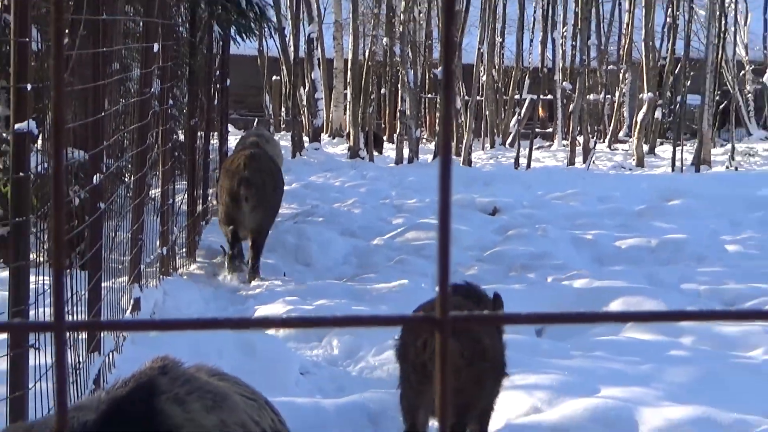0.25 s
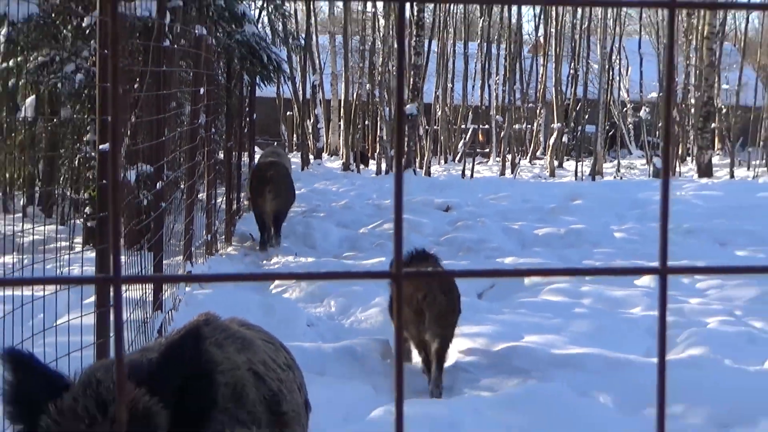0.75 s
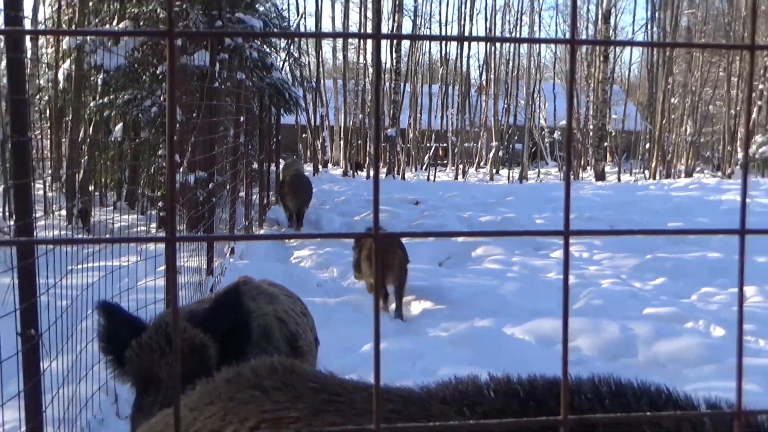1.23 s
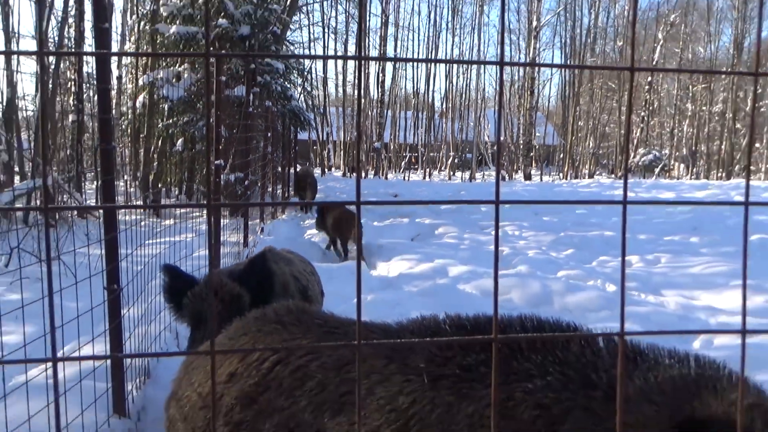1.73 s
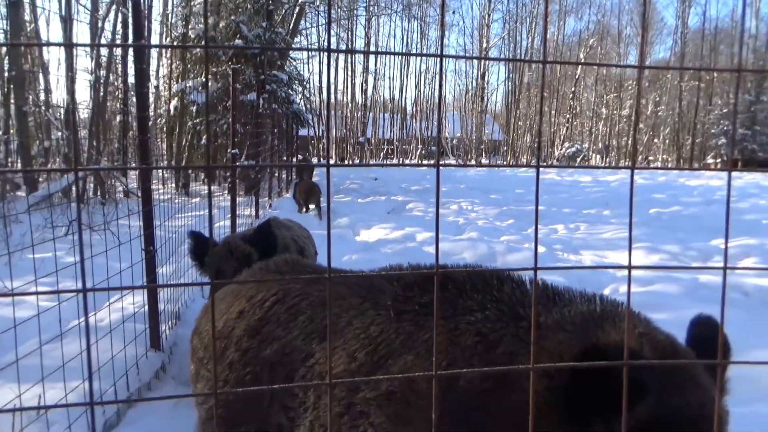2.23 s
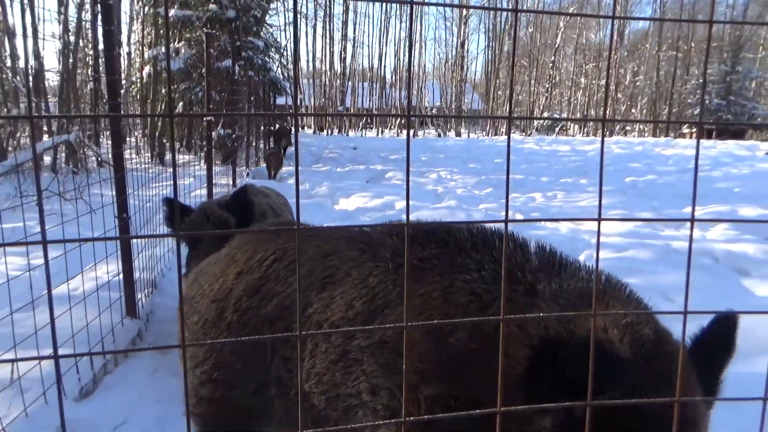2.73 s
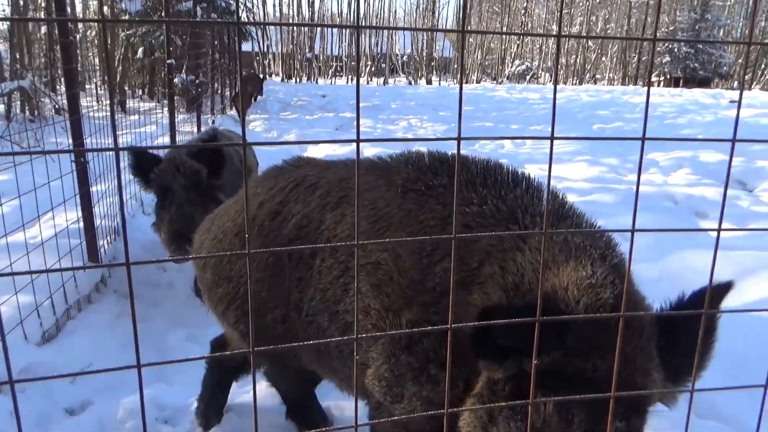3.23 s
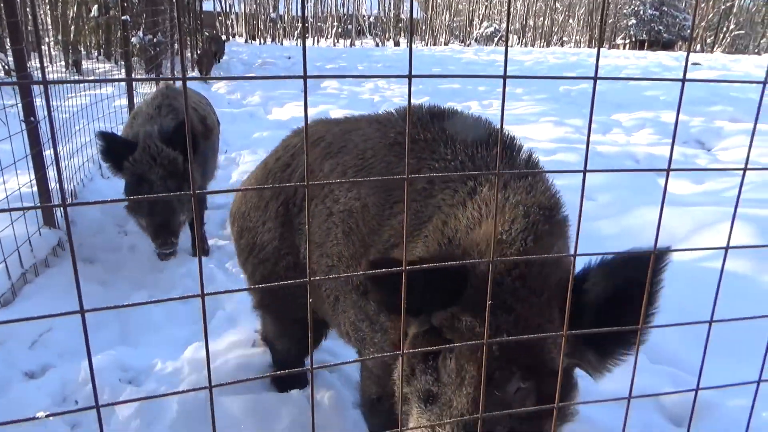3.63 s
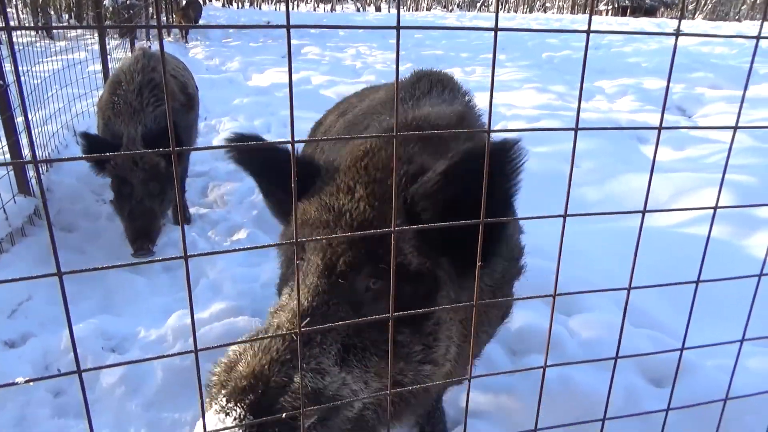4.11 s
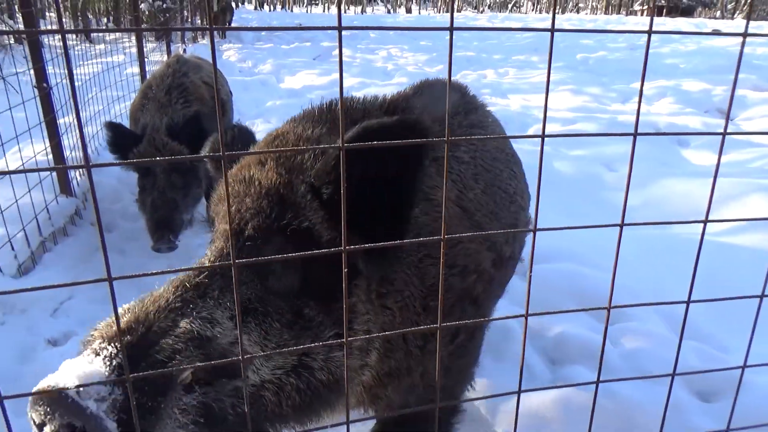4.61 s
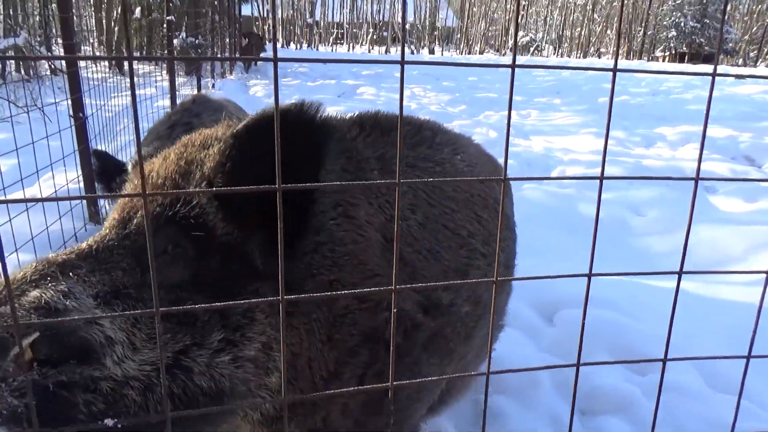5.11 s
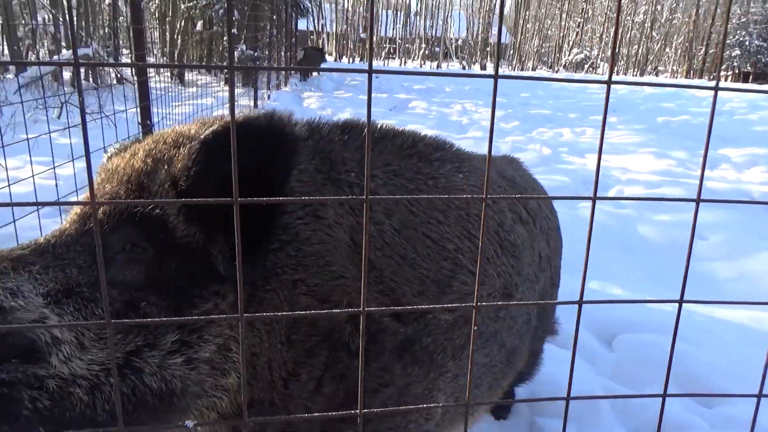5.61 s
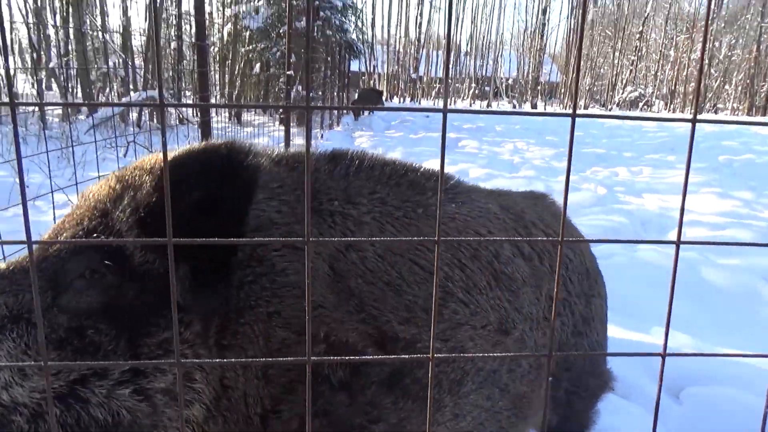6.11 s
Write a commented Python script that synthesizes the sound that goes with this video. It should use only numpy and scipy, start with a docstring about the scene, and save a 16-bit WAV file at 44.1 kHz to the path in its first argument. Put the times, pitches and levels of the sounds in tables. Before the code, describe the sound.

Still, open winter air with a soft hiss and faint deep hum throughout. From 0.2 s, very quiet hoof steps press distant snow. At about 0.8 s a muffled low grunt begins, then a fuller pulsing one from 1.1 to 1.4 s, rising at its end, with brief dry throat rattles around it; a weaker grunt and rattle follow at 1.5 s. It falls nearly silent, with a faint grunt at 2.3 s. From 2.6 s crisp crackles start close by, with hollow pops near 2.9 s, growing into heavy crunching from 3.2 to 4.0 s and brittle cracking until 4.8 s, including a sharp snap at 4.2 s. At 4.9 s comes a hard crack and a strong, pinched, whistling sniff. Shorter sniffs, wet jaw claps, dull bumps and crunches continue, with another strong sniff at 6.1 s and low thumps to the end.

```python
"""In a snowy pen, wild boars trot away and grunt low in the distance, with dry rattles in the throat.
A big one wades up to the wire fence, its hooves crunching through the crust, then sniffs and smacks its jaws.
Still winter air and a faint low hum lie under it all. Snow is made of tiny random breaks, grunts of slow
pulses through a chest, rattles of short puffs, and sniffs of noise ringing in the nostrils."""
import sys
import numpy as np
from scipy import signal
from scipy.fft import rfft, irfft, next_fast_len
from scipy.io import wavfile
from scipy.ndimage import uniform_filter1d, map_coordinates

SR = 44100
rng = np.random.default_rng(int(sys.argv[2]) if len(sys.argv) > 2 else 0)


def materialize(psi):
    """Save the field psi as 16-bit PCM at rate SR to the path in sys.argv[1].

    A 1-D psi becomes a single channel; in a 2-D psi each row is a channel.
    """
    bounded = np.clip(np.atleast_2d(psi).T, -1, 1)
    quanta = np.round(bounded * 32767).astype(np.int16)
    wavfile.write(sys.argv[1], SR, quanta)


N = 280374


def amp(db):
    """Turn decibels into a gain."""
    return 10 ** (np.asarray(db) / 20)


def unit(x):
    """Scale x to an rms (average strength) of 1."""
    return x / np.sqrt(np.mean(x ** 2) + 1e-20)


def along(points, hz):
    """Read a curve of (Hz, value) points on a logarithmic frequency axis."""
    point_hz, values = np.transpose(points)
    return np.interp(np.log(hz + 1), np.log(point_hz + 1), values)


def wobble(rate):
    """A smooth random curve with this many random points a second."""
    points = rng.standard_normal(int(N * rate / SR) + 4)
    return map_coordinates(points, [np.arange(N) * rate / SR])


def swell(s, hold, attack, release):
    """A gain that rises 60 dB over the attack up to time s, holds, and falls 60 dB over the release."""
    t = np.arange(0, N / SR, 1 / 1000)
    before = np.maximum(s - t, 0) / attack
    after = np.maximum(t - s - hold, 0) / release
    gain = np.exp(-np.log(1000) * np.minimum(before + after, 10))
    return np.interp(np.arange(N) / SR, t, gain)


def filtered(x, response):
    """Multiply the spectrum of x by a response, given as a function of frequency."""
    m = next_fast_len(N + SR // 4)
    return irfft(rfft(x, m) * response(np.fft.rfftfreq(m, 1 / SR)), m)[..., :N]


def coloured(x, spectrum):
    """Shape x by a spectrum and scale it to rms 1."""
    return unit(filtered(x, lambda hz: amp(along(spectrum, hz))))


def resonances(modes):
    """The response of a few damped resonances, neighbours taken with opposite signs."""
    def response(f):
        total = 0
        for k, (centre, width, db) in enumerate(modes):
            ring = 1j * f * width / (centre ** 2 - f ** 2 + 1j * f * width)
            total = total + (-1) ** k * amp(db) * ring
        return total
    return response


def impulse(spectrum, size=2048):
    """The most compact click with this spectrum that starts at time zero (minimum phase)."""
    cepstrum = irfft(np.log(amp(along(spectrum, np.fft.rfftfreq(size, 1 / SR)))))
    cepstrum[1:size // 2] *= 2
    cepstrum[size // 2 + 1:] = 0
    return irfft(np.exp(rfft(cepstrum)))


def stereo(pair, alike):
    """Mix two unrelated signals to left and right with a given likeness at each frequency."""
    def mid_and_side(hz):
        angle = np.arccos(np.clip(along(alike, hz), -1, 1)) / 2
        return np.array([np.cos(angle), np.sin(angle)])
    mid, side = filtered(pair, mid_and_side)
    return np.array([mid + side, mid - side])


def surroundings(x, t60, size=8192):
    """A short scatter from the fence and the animals, as fading noise; snow swallows the rest."""
    tail = rng.standard_normal((2, size)) * amp(-60 * np.arange(size) / SR / t60)
    return signal.fftconvolve(x, tail / np.linalg.norm(tail[0]), axes=1)[:, :N]


# The tone of the still air. Each row: frequency in Hz, relative strength in dB per Hz.
AIR = [(20, -25), (45, -3), (90, -6.5), (160, -7.5), (225, -3), (268, 3), (330, -6), (580, -6.5), (770, -2),
       (1100, -8), (6000, -17), (9000, -16), (15000, -25)]
# How alike the air is on both sides. Each row: frequency in Hz, left-right likeness (1 is identical).
AIR_ALIKE = [(60, 1), (300, 0.85), (1000, 0.25), (3000, 0.53), (8000, 0.99)]
# The steady hum. Each row: frequency in Hz, average level in dB.
HUM = [(55.8, -65), (215, -76.5)]


def background():
    """Still air as soft noise, and a low hum of sine tones that are slightly unsteady."""
    t = np.arange(N) / SR
    air = stereo(coloured(rng.standard_normal((2, N)), AIR), AIR_ALIKE)
    air = air * amp(-61.5 + 0.22 * wobble(rate=4.45))
    hum = np.zeros(N)
    for hz, db in HUM:
        level = amp(db + 0.38 * wobble(rate=4.6))
        phase = 2 * np.pi * hz * t + 0.4 * wobble(rate=2.6)
        hum += level * np.sqrt(2) * np.sin(phase)
    return air + hum


def grains(rate, spread_db):
    """Two streams of tiny ice fractures of unequal size, this many a second on average."""
    size = amp(spread_db * np.clip(rng.standard_normal((2, N)), -2, 2))
    happens = rng.random((2, N)) < rate / SR
    return unit(happens * size * rng.choice([-1, 1], (2, N)))


# The tone of the breaking crust. Each row: frequency in Hz, relative strength in dB per Hz.
CRUST = [(150, -54), (500, -10.5), (1100, -5), (2300, -2.5), (5200, -6.5), (7000, -3.5), (8700, 0),
         (10000, -4), (12000, -10), (16000, -28)]
# How alike the snow sounds on both sides. Each row: frequency in Hz, left-right likeness (1 is identical).
SNOW_ALIKE = [(120, 1), (400, 0.98), (1000, 0.94), (2300, 0.93), (5000, 0.98), (10000, 1)]
# Hoof falls of the distant boars in the snow. Each row: time in seconds, level in dB.
FAR_STEPS = [(.24, -66.5), (.73, -67), (.96, -69), (1.07, -67), (1.25, -59.5), (1.38, -62), (1.62, -61),
             (1.83, -72), (1.99, -68)]


def far_steps():
    """Distant hooves break ice grains in clumps; each step swells and fades."""
    load = np.zeros(N)
    for s, db in FAR_STEPS:
        load += amp(db) * swell(s, hold=0.0086, attack=0.28, release=0.52)
    crust = coloured(grains(rate=7900, spread_db=5.0) * amp(2.3 * wobble(rate=190)), CRUST)
    return stereo(load * crust, SNOW_ALIKE)


# Resonances of the mouth. Each row: frequency in Hz, width in Hz, level in dB.
MOUTH_MODES = [(1570, 1060, 5), (2520, 820, 5.5), (4440, 1700, -4)]
# Bouts of dry rattling in the throat. Each row: first pulse in seconds, last pulse in seconds,
# first strength in dB, last strength in dB, first brightness in dB, last brightness in dB.
RATTLE = [(1.04, 1.07, -35.5, -42, 0, -2), (1.094, 1.164, -42.5, -44, 5, 12),
          (1.288, 1.368, -39.5, -43, 5, 4), (1.524, 1.602, -37, -33.5, 4.5, -2.5)]
PULSE_GAP_S, PULSE_T60_S = 0.0255, 0.014  # approximate gap between pulses; time for one to fade 60 dB


def rattle(size=1024):
    """Throat pulses are short puffs ringing the mouth; brightness shifts weight to its highest resonance."""
    puffs = np.zeros((len(MOUTH_MODES), N))
    fade_db = -60 * np.arange(size) / SR / PULSE_T60_S
    height = np.linspace(-1, 1, len(MOUTH_MODES))[:, None]  # lowest to highest resonance
    for first, last, first_db, last_db, first_bright, last_bright in RATTLE:
        count = round((last - first) / PULSE_GAP_S) + 1
        start, end = (first, first_db, first_bright), (last, last_db, last_bright)
        for s, db, bright_db in np.linspace(start, end, count):
            uneven_db = 0.5 * rng.standard_normal(height.shape)
            strength_db = db + bright_db * height + uneven_db
            puffs[:, round(s * SR):][:, :size] += amp(strength_db + fade_db) * rng.standard_normal(size)
    direct = np.zeros(N)
    for puff, (centre, width, db) in zip(puffs, MOUTH_MODES):
        ring = resonances([(centre, width, 0)])
        # the third power leaves dark valleys between resonances
        direct += amp(db) * filtered(puff, lambda hz: ring(hz) ** 3)
    return direct + amp(-7) * surroundings(direct[None], t60=0.43)


# Low grunts. Each row: time in seconds, hold in seconds, starting pulse rate in Hz, fall of that rate in Hz
# per second, level in dB before the last push, mouth opening from 0 to 1, strength of the last push from 0 to 1.
GRUNTS = [(0.789, 0.16, 55.6, 20.6, -55, 0, 0), (1.077, 0.29, 42.1, 6.7, -55, 0.96, 0.74),
          (1.52, 0.103, 60.9, 55, -66.5, 1, 0.05), (2.302, .09, 59.9, 20, -66, 0, 0.02)]
# a full last push: its length, its rise in pitch and level, and how far the mouth closes (0 to 1)
PUSH_S, PUSH_HZ, PUSH_DB, PUSH_CLOSES = 0.1, 17, 7, 0.74


def grunt_controls():
    """Pitch, loudness and mouth: a grunt sags in pitch, and a last push lifts it as the mouth closes."""
    t = np.arange(N) / SR
    total, pitch, mouth = np.zeros((3, N))
    for s, hold, hz, sag, db, opening, push in GRUNTS:
        age = np.clip(t - s, 0, hold)
        effort = push * np.clip(1 - (hold - age) / PUSH_S, 0, 1)
        gain = amp(db + PUSH_DB * effort) * swell(s, hold, attack=0.122, release=0.183)
        total += gain
        # the louder grunt counts for more where two overlap
        pitch += gain * (hz - sag * age + PUSH_HZ * effort ** 2)
        mouth += gain * (opening - PUSH_CLOSES * effort)
    return pitch / total, total, np.clip(mouth / total, 0, 1)


# The tone the chest gives each pulse. Each row: frequency in Hz, relative strength in dB per Hz.
CHEST = [(25, -46), (45, -8.5), (58, -1.5), (85, 4.5), (125, 1.5), (170, -11.5), (212, -3), (255, -17),
         (320, -23), (700, -22), (1500, -55)]


def grunts():
    """Slow pulses of the vocal folds through the chest; a closed mouth lets only the lowest harmonics out."""
    pitch_hz, gain, opening = grunt_controls()
    cycles = np.cumsum(pitch_hz * (1 + 0.021 * wobble(rate=42))) / SR
    pulses = np.diff(np.floor(cycles), prepend=0)  # one click per finished cycle
    pulses = pulses * amp(1.5 * wobble(rate=81))
    bright = unit(signal.fftconvolve(pulses, impulse(CHEST))[:N])
    muffled = unit(filtered(bright, lambda hz: 1 / (1 + (hz / 78) ** 4)))
    lowest_mode = resonances(MOUTH_MODES[:1])
    # breath escaping through the snout
    air = unit(filtered(rng.standard_normal(N), lambda hz: lowest_mode(hz) ** 2))
    return (opening * bright + (1 - opening) * muffled + amp(-15.0) * air) * gain


# The near boar's hooves and snout pressing into the snow. Each row: time in seconds, hold in seconds,
# level of the crunching crust in dB, level of the dull packing underneath in dB.
TREADS = [(2.604, 0.19, -68.5, -72), (2.809, 0.12, -50, -56.5), (3.045, 0.057, -54, -60),
          (3.236, 0.15, -38.5, -58), (3.40, 0.048, -41, -49.5), (3.497, 0.11, -40, -56),
          (3.66, .08, -45, -53), (3.794, 0.025, -45.5, -52.5), (3.892, 0.062, -44, -53),
          (3.987, 0.084, -56, -51), (4.235, 0.22, -51.5, -64), (4.427, 0.05, -47.5, -73),
          (4.831, 0.067, -36.5, -51), (5.061, 0.089, -45, -50), (5.245, 0.006, -40.5, -59),
          (5.505, 0.016, -42, -68), (5.574, 0.02, -40, -64), (5.712, 0.19, -49.5, -44.5),
          (5.967, 0.08, -72, -48.5), (6.09, 0.032, -40.5, -66)]
# Its shuffling between treads, with one short dip. Each row: time in seconds, level of the crunch in dB.
SHUFFLE = [(2.55, -92), (2.76, -62), (3.14, -59.5), (3.7, -53), (4.48, -54), (4.55, -65), (4.72, -49.5),
           (6.35, -53)]


def snow_load():
    """How hard the near boar works the crust and the snow beneath: its treads over a shuffle."""
    t = np.arange(N) / SR
    times, level_db = np.transpose(SHUFFLE)
    active = uniform_filter1d(1. * ((t >= times[0]) & (t <= times[-1])), size=200)  # soft edges
    shuffle = active * amp(np.interp(t, times, level_db))
    crunch_power = shuffle ** 2
    pack_power = (shuffle * amp(0.5)) ** 2  # packing is slightly stronger than crunch
    for s, hold, crunch_db, pack_db in TREADS:
        weight = swell(s, hold, attack=0.13, release=0.27) ** 2
        crunch_power = crunch_power + weight * amp(crunch_db) ** 2
        pack_power = pack_power + weight * amp(pack_db) ** 2
    return np.sqrt(crunch_power), np.sqrt(pack_power)


def patchy(x, depth_db, size=512):
    """Give x brief random resonances scattered over time and frequency, and scale it to rms 1."""
    z = signal.stft(x, nperseg=size)[2]
    field = uniform_filter1d(rng.standard_normal(z.shape[1:]), size=4, axis=0)  # blur over frequency
    field = uniform_filter1d(field, size=3, axis=1)  # blur over time
    reach = 1 / (1 + (np.fft.rfftfreq(size, 1 / SR)[:, None] / 4000) ** 2)  # the treble stays smooth
    return unit(signal.istft(z * amp(depth_db * reach * unit(field)), nperseg=size)[1][:, :N])


# The tone of snow packing underneath. Each row: frequency in Hz, relative strength in dB per Hz.
PACKED = [(30, -10), (70, -3), (160, -1.5), (300, -3.5), (1000, -6.5), (1600, -9), (4000, -25)]
LIGHT_LOAD_DB, FULL_LOAD_DB = -49.5, -46.5  # crunch level under a light hoof and under full weight


def near_treads(crunch, pack):
    """Ice grains snap in clumps under a light hoof, more evenly under full weight; the snow below packs dully."""
    clumps = wobble(rate=170)
    load_db = 20 * np.log10(crunch + 1e-9)
    clump_db = np.interp(load_db, [LIGHT_LOAD_DB, FULL_LOAD_DB], [3.0, 1.8])  # unevenness of the grains
    crust = coloured(grains(rate=9000, spread_db=2) * amp(clump_db * clumps), CRUST)
    packed = coloured(grains(rate=4000, spread_db=3) * amp(1.14 * clumps), PACKED)
    return stereo(crunch * crust + pack * patchy(packed, depth_db=3.5), SNOW_ALIKE)


def crumbs(crunch, count=400):
    """Small cracks at random moments, louder where the crust is loaded more."""
    draws = rng.random((count, 3))
    # random gaps, up to about 60 cracks a second
    times = SHUFFLE[0][0] + np.cumsum(-np.log(1 - draws[:, 0])) / 60
    # 0.73 dB louder for each dB of load
    level_db = -52.5 + 0.73 * (20 * np.log10(crunch + 1e-9) - LIGHT_LOAD_DB)
    events = []
    for s, (_, a, b) in zip(times, draws):
        if s < (N - 1) / SR and crunch[int(s * SR)] > amp(-60):
            scatter_db = 0.25 * np.log(a / (1 - a))
            length, bright_db = 0.0037, 6 * b
            events.append((s, length, level_db[int(s * SR)] + scatter_db, bright_db))
    return events


def fracture(length, spread_db, fade_db, size):
    """A run of small breaks that builds up quickly and weakens over its length."""
    u = np.arange(size) / (SR * length)  # time counted in lengths
    sizes = rng.standard_normal(size) * amp(spread_db * np.clip(rng.standard_normal(size), -2, 2))
    return sizes * (1 - np.exp(-u / 0.077)) * amp(-fade_db * np.minimum(u, 10) ** 2)


# The tones of a crack's crisp edge, its woody body and its soft thud.
# Each row: frequency in Hz, relative strength in dB per Hz.
EDGE = [(2500, -55), (5200, -6.5), (7000, 3.5), (8500, 5), (10000, 2), (12000, -7), (16000, -22.5)]
BODY = [(150, -10), (600, -0.5), (1200, 3), (2700, -2), (4200, -7), (5500, -12), (9000, -48.5)]
THUD = [(40, -16), (100, -4.5), (200, 2), (330, -6.5), (500, 0.5), (800, -7), (2000, -32)]


def cracks(events, body_db, thud_db, spread_db, size=2048):
    """A crack is a run of breaks with a crisp edge, woody body and soft thud; brightness trades thud for edge."""
    out = np.zeros((2, N + size))
    clicks = rfft([impulse(EDGE), impulse(BODY), impulse(THUD)], 2 * size)
    for s, length, db, bright_db in events:
        part_levels_db = (bright_db, body_db, thud_db - bright_db)
        for channel in out:
            run = fracture(length, spread_db, fade_db=5.5, size=size)
            parts = irfft(rfft(run, 2 * size) * clicks)[:, :size]
            sound = sum(unit(part) * amp(db + part_db) for part, part_db in zip(parts, part_levels_db))
            # the level holds over the crack's own length, so a shorter crack carries less energy
            channel[round(s * SR):][:size] += sound * np.sqrt(length * SR / size)
    return stereo(out[:, :N], SNOW_ALIKE)


# Small hollow pops in the crust and the mouth. Each row: time in seconds, starting level in dB, pitch in Hz.
POPS = [(1.991, -48, 1910), (2.884, -35.5, 870), (2.924, -36, 890), (2.941, -29, 1085), (3.010, -35, 1380),
        (3.288, -33, 1150), (3.513, -29.5, 1730), (3.897, -33.5, 1180), (3.9, -32, 1740),
        (4.604, -35, 1400), (4.645, -36.5, 1689), (5.757, -32.5, 999.5), (6.202, -31.5, 1316)]


def pops(cycles, size=2048):
    """A little air pocket opens and rings, fading 60 dB over the given number of cycles."""
    out, t = np.zeros(N + size), np.arange(size) / SR
    for s, db, hz in POPS:
        onset = 1 - np.exp(-t * hz / 0.65)
        fade = amp(db - 60 * t * hz / cycles)
        out[round(s * SR):][:size] += fade * np.sin(2 * np.pi * hz * t) * onset
    return out[:N]


# Soft bumps of the snout, jaws and hooves. Each row: time in seconds, starting level in dB, pitch in Hz.
BUMPS = [(3.191, -35.5, 486), (4.202, -38, 330), (4.439, -29.5, 218), (4.868, -30.5, 190),
         (4.912, -32, 240), (4.996, -33.5, 274), (5.126, -26.5, 272), (5.356, -42, 280),
         (5.208, -24.5, 216), (5.455, -35, 322), (5.994, -33.5, 317.4), (6.045, -33, 188),
         (6.095, -29.5, 147.5), (6.170, -30.5, 141), (6.23, -29, 149.5), (6.237, -32.5, 449)]


def bumps(t60, puff_db, size=4096):
    """Flesh lands on snow or on flesh: one low push that dies quickly, with a dull puff."""
    out, t = np.zeros(N + size), np.arange(size) / SR
    for s, db, hz in BUMPS:
        puff = unit(signal.fftconvolve(rng.standard_normal(size), impulse(THUD))[:size])
        push = np.sin(2 * np.pi * hz * t) + amp(puff_db) * puff
        onset = 1 - np.exp(-t / 0.001)
        out[round(s * SR):][:size] += amp(db - 60 * t / t60) * push * onset
    return out[:N]


# The jaws smacking. Each row: time in seconds, length in seconds, level in dB before the head is placed
# slightly left, brightness in dB.
SMACKS = [(4.9904, 0.0041, -26, 6), (5.1226, 0.0041, -25.5, 2), (5.206, 0.003, -32.5, 2.5),
          (5.29, 0.0036, -33, -3), (5.3555, 0.002, -41, -7.5), (5.452, 0.0021, -28.5, -1.5),
          (5.5654, 0.0015, -33, -2.5), (5.6623, 0.0039, -33, 2), (5.697, 0.0028, -38.5, -1.5),
          (5.874, 0.0035, -34.5, -2), (6.0916, 0.0038, -34, 1)]


def smacks():
    """The jaws clap shut, and the wet lips part again more softly just after."""
    delay_s, softer_db = 0.0055, -13
    partings = [(s + delay_s, length, db + softer_db, bright_db) for s, length, db, bright_db in SMACKS]
    return SMACKS + partings


def airflow(modes, drift_db=2.5, steep=0.42):
    """Noise of rms 1 in steep-sided resonances whose strengths drift."""
    def band(centre, width, db):
        shape = resonances([(centre, width, 0)])
        noise = rng.standard_normal((2, N))
        return filtered(noise, lambda hz: amp(db) * (np.abs(shape(hz)) + 1e-9) ** (1 + steep))
    return unit(sum(amp(drift_db * wobble(rate=22)) * band(*mode) for mode in modes))


def whistle(hz, width_hz=580):
    """The wet rim's whistle: a narrow band of turbulence of rms 1 that follows a pitch curve."""
    phase = 2 * np.pi * np.cumsum(hz) / SR
    channels = [wobble(width_hz) * np.cos(phase) + wobble(width_hz) * np.sin(phase) for _ in range(2)]
    return unit(np.array(channels))


# Sniffs of the near boar. Each row: time in seconds, attack in seconds, hold in seconds, release in seconds,
# level of the rush of air in dB before the head is placed slightly left,
# nostrils from 0 (flared) to 1 (pinched), whistle in Hz at full effort before it wanders.
SNIFFS = [(4.872, 0.29, 0.043, 0.32, -33.5, 0.96, 4450), (4.936, 0.13, 0.024, .2, -38, 0.71, 4342),
          (5.06, 0.095, 0.013, 0.18, -42, 0.48, 2604), (5.239, 0.16, 0.0253, .15, -39, 0.45, 5530),
          (5.548, 0.196, 0.041, 0.37, -45.5, 0.41, 5996), (5.70, 0.11, 0.13, 0.46, -44, 0.89, 2556),
          (5.877, 0.077, 0.019, 0.16, -37, 0.056, 4063), (5.928, 0.101, .025, .3, -42, 0.061, 4173),
          (5.98, 0.19, .08, .3, -45.5, 0.074, 3613), (6.108, 0.205, 0.011, 0.39, -35, 0.23, 3855),
          (6.29, 0.19, 0.024, 0.31, -50, 0.048, 4166)]
# Resonances of the pinched and of the flared nostrils. Each row: frequency in Hz, width in Hz, level in dB.
PINCHED = [(1060, 200, -2.5), (2590, 570, 2), (3460, 370, 2), (4800, 1600, -0.5), (9250, 820, -5.5)]
FLARED = [(760, 690, 4), (1080, 710, 5), (1790, 1100, -2), (2570, 370, -3), (3500, 250, 4.5),
          (4200, 500, 1), (4730, 1100, 0)]
# How alike the nostrils sound on both sides. Each row: frequency in Hz, left-right likeness (1 is identical).
NOSE_ALIKE = [(700, 0.42), (1300, 0.75), (2400, 0.36), (4400, 0.63)]
WHISTLE_DB = -6.5  # the whistle against the rush of air
WHISTLE_WANDER, WHISTLE_SAG = 0.025, 0.031  # share of its pitch it wanders, and sinks when effort is low


def snout():
    """Turbulent air rings the wet nostrils, pinched or flared, and each sniff has its own breathy whistle."""
    pinched_power, flared_power, weighted_hz = np.zeros((3, N))
    for s, attack, hold, release, db, pinch, hz in SNIFFS:
        effort = swell(s, hold, attack, release)
        power = (amp(db) * effort) ** 2
        pinched_power += pinch * power
        flared_power += (1 - pinch) * power
        weighted_hz += power * hz * (1 - WHISTLE_SAG * (1 - effort))
    total = pinched_power + flared_power
    rush = np.sqrt(pinched_power) * airflow(PINCHED) + np.sqrt(flared_power) * airflow(FLARED)
    rim_hz = weighted_hz / total * (1 + WHISTLE_WANDER * wobble(rate=22))
    flow = rush + amp(WHISTLE_DB) * np.sqrt(total) * whistle(rim_hz)
    flutter = unit(amp(1.7 * wobble(rate=140)))
    return stereo(flow * flutter, NOSE_ALIKE)


# The crust breaking. Each row: time in seconds, length in seconds, level in dB, brightness in dB.
CRACKS = [(.216, 0.0028, -61, 3), (.947, 0.0037, -67.5, 12.5), (1.154, 0.0014, -48.5, 1.5),
          (1.246, .006, -57.5, 7.5), (2.037, .0006, -62, 7), (2.212, 0.0067, -59, 2.5),
          (2.237, 0.0039, -56, -3), (2.597, 0.0049, -57, 6), (2.614, 0.0055, -58, 4),
          (2.641, 0.004, -58, 6.5), (2.674, 0.0053, -49.5, 3), (2.704, 0.012, -55, 1),
          (2.708, 0.0018, -35, 1), (2.732, 0.009, -51, 1), (2.754, 0.0095, -48.5, 1),
          (2.783, 0.0055, -48, 1.5), (2.818, 0.006, -48, 1.5), (2.856, 0.004, -48, 1),
          (2.891, 0.0057, -50, 4), (2.94, 0.0037, -38.5, -2), (2.968, .007, -46, 2.5),
          (3.009, 0.0067, -46.5, 6), (3.026, 0.0044, -49.5, 1), (3.070, 0.0066, -42, -1),
          (3.15, 0.0093, -45, -1), (3.19, 0.0029, -44, -11), (3.233, 0.0096, -38.5, 6),
          (3.288, 0.016, -42.5, 0), (3.429, 0.012, -40, 2), (3.491, 0.0074, -43.5, 1),
          (3.512, 0.0066, -44, -1), (3.809, 0.0055, -52.5, 13), (3.898, 0.0065, -41.5, 2),
          (3.949, 0.0053, -53.5, 5), (4.097, 0.0091, -43.5, 1), (4.142, 0.007, -43, 5),
          (4.156, 0.0035, -45, 3.5), (4.195, 0.009, -42, 3), (4.1984, 0.0006, -24, 1.5),
          (4.242, 0.0082, -41.5, 4), (4.305, 0.011, -41.5, -1), (4.331, 0.0068, -47.5, 6.5),
          (4.371, 0.0094, -41.5, 0), (4.392, 0.0013, -49, 11), (4.425, 0.016, -36, 1),
          (4.481, 0.014, -52.5, 9.5), (4.497, 0.0006, -47, 17.5), (4.506, 0.0068, -53, 9.5),
          (4.603, 0.0048, -46, -1), (4.6435, 0.0046, -49.5, -4), (4.671, 0.0082, -45, -1),
          (4.714, 0.0066, -38.5, -2), (4.778, 0.01, -42.5, -2.5), (4.9046, 0.00052, -20, 3.5),
          (4.9238, 0.00077, -26.5, 4), (5.612, 0.0032, -52, 12)]


def scene():
    """Add everything up, with the near boar's head a little to the left."""
    crunch, pack = snow_load()
    crust = cracks(CRACKS + crumbs(crunch), body_db=-0.2, thud_db=-2.5, spread_db=4.0) + pops(cycles=25)
    head = cracks(smacks(), body_db=4, thud_db=-3, spread_db=10.0) + snout()
    head = head * amp(np.array([[0.69], [-0.69]]))  # dB on the left and the right
    near = crust + head + amp(-25) * surroundings(crust + head, t60=0.082)
    near = near + bumps(t60=0.041, puff_db=-8.5) + near_treads(crunch, pack)
    return background() + far_steps() + rattle() + grunts() + near


def record(dry):
    """Keep only what lies below 16100 Hz."""
    return filtered(dry, lambda hz: hz < 16100)


dry = scene()
out = record(dry)
materialize(out)
```